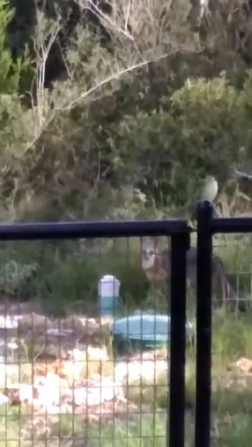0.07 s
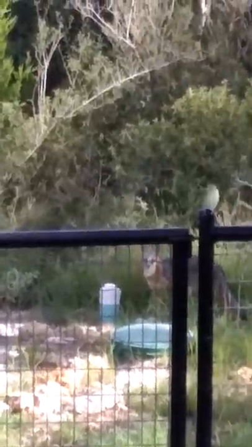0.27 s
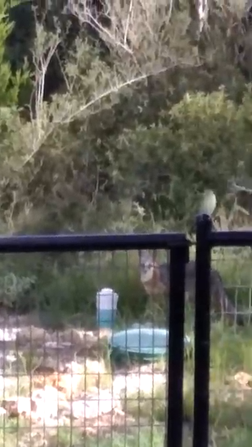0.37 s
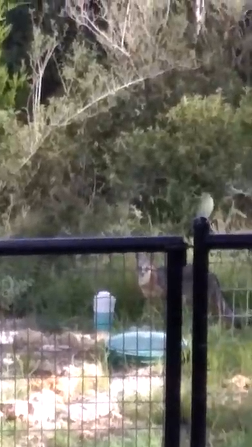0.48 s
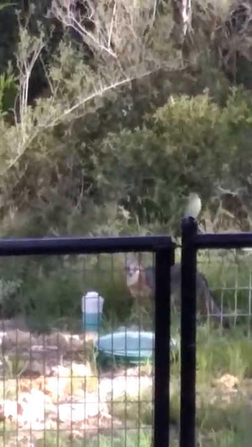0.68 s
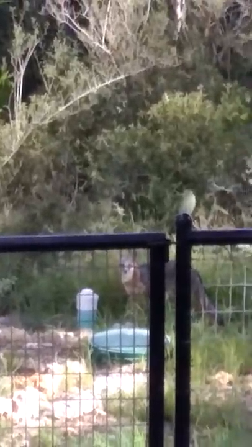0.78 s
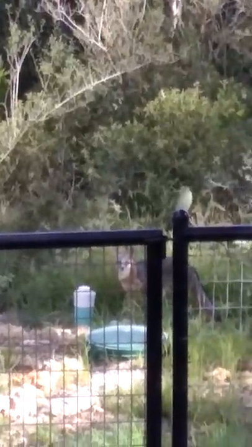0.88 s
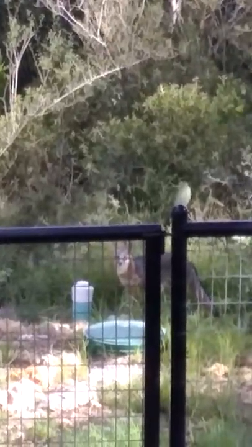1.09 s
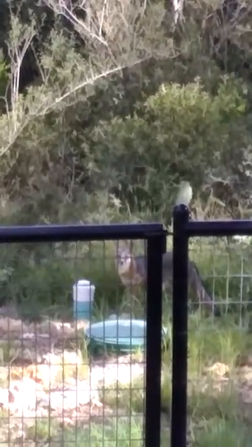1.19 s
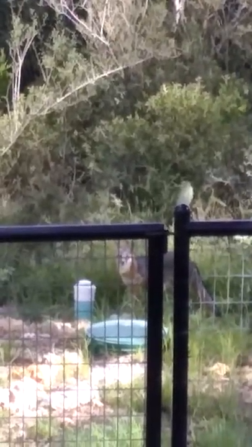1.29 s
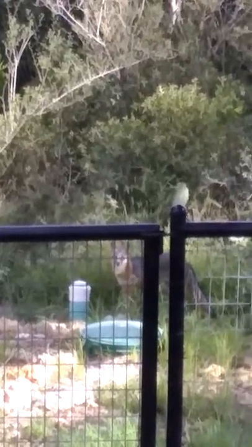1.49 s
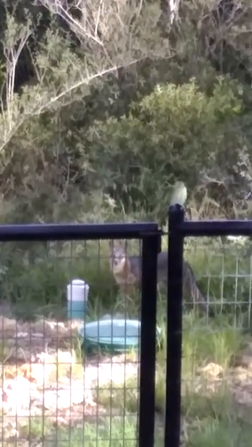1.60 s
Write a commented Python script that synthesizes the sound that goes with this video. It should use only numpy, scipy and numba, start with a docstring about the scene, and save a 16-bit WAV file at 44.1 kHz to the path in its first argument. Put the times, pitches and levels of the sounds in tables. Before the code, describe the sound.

Two raspy fox barks in quick succession outdoors, over a faint high insect buzz.

```python
"""A grey fox gives two hoarse barks from the edge of a yard, heard through a fence with scrub behind.
Its vocal folds ring throat and mouth; each bark arches in pitch and breaks into a rasp at the top,
and the bushes scatter it. An insect's wings buzz very high throughout, a dove coos once far off among
faint animal calls, and a thin hiss comes and goes over a low rumble."""
import sys
import numpy as np
from scipy import signal
from scipy.fft import rfft, irfft
from scipy.io import wavfile
from scipy.ndimage import uniform_filter1d, map_coordinates
from numba import njit

SR = 44100
rng = np.random.default_rng(int(sys.argv[2]) if len(sys.argv) > 2 else 0)


def transcribe(u):
    """Save the signal u as a 16-bit wav file named by the first command-line argument.

    u: samples, shape (n,) or (channels, n), limited to [-1, 1]; the rate is SR.
    q: integer samples, one column per channel.
    """
    v = np.clip(np.atleast_2d(u).T, -1, 1)
    q = np.round(v * 32767).astype(np.int16)
    wavfile.write(sys.argv[1], SR, q)


N = 72765
T = np.arange(N) / SR


def undb(db):
    """Decibels to gain."""
    return 10 ** (np.asarray(db) / 20)


def unit(x):
    """Scale to rms 1."""
    return x / np.sqrt(np.mean(x ** 2))


def curves(table):
    """Each column after time_s, interpolated linearly over T."""
    times, *columns = np.array(table, float).T
    return [np.interp(T, times, c) for c in columns]


def during(table):
    """1 over a table's time span, with short fades."""
    return uniform_filter1d(1. * ((T > table[0][0]) & (T < table[-1][0])), size=256)


def pan(db):
    """Stereo gains for a left-minus-right level."""
    return undb(np.array([[db], [-db]]) / 2)


def wander(rate_hz):
    """Smooth random curve, rms 1."""
    return unit(map_coordinates(rng.standard_normal(4096), [T * rate_hz], mode="wrap"))


def phase_rad(hz):
    """Running phase of a moving frequency."""
    return 2 * np.pi * np.cumsum(hz) / SR


def tint(x, colour):
    """Filter by (freq_hz, gain_db) points."""
    hz, db = np.array(colour, float).T
    bins_hz = np.fft.rfftfreq(N, 1 / SR)
    return irfft(rfft(x) * undb(np.interp(np.log(bins_hz + 1), np.log(hz), db)), N)


def noise(colour, correlation):
    """Coloured stereo noise, rms 1."""
    x = tint(rng.standard_normal((3, N)), colour)
    return unit(np.sqrt(correlation) * x[0] + np.sqrt(1 - correlation) * x[1:])


@njit
def bandpass(x, centre_hz, width_hz):
    """State-variable band-pass with a moving centre."""
    y, band, low = np.empty(len(x)), 0., 0.
    for i in range(len(x)):
        g, k = np.tan(np.pi * centre_hz[i] / SR), width_hz / centre_hz[i]
        v = (band + g * (x[i] - low)) / (1 + g * (g + k))
        band, low, y[i] = 2 * v - band, low + 2 * g * v, k * v
    return y


def resonate(x, hz, width_hz):
    """Steep resonance: two band-passes in series."""
    centre_hz = hz * np.ones(N)
    return bandpass(bandpass(x, centre_hz, 1. * width_hz), centre_hz, 1. * width_hz)


def background():
    """Faint outdoor air and a low, uneven rumble."""
    # freq_hz, gain_db
    air_colour = [(200, -5.5), (350, -10.5), (700, 3), (1100, -5), (1700, -2), (2200, -9.5), (4000, -14.5),
                  (8000, -15.5), (12000, -22.5), (15000, -30)]
    rumble_colour = [(20, -31.5), (40, -22.5), (60, 1.5), (82, 0.5), (105, -6.5), (170, -4.5), (250, -10.5),
                     (330, -5), (450, -23.5), (1200, -44.5), (6000, -81.5)]
    # time_s, level_db
    rumble_level = [(0, -63.5), (.2, -66.5), (.25, -58), (.45, -51), (.6, -50.5), (.69, -56), (.82, -46.5),
                    (.88, -56), (.95, -50.5), (.98, -65.5), (1.1, -68.5), (1.14, -62), (1.25, -70),
                    (1.65, -73.5)]
    rumble = noise(rumble_colour, correlation=.93) * undb(curves(rumble_level)[0] + 1.5)
    return rumble + undb(-70.5) * noise(air_colour, correlation=.2)


def far_calls():
    """Short wavering notes from distant animals."""
    # centre_s, length_s, pitch_hz, level_db
    notes = [(1.06, 0.031, 645, -65), (1.062, 0.071, 1450, -72), (1.16, 0.055, 1200, -75),
             (1.296, .06, 1475, -72), (1.338, 0.065, 1124, -75), (1.43, .06, 1460, -72.5)]
    calls = np.zeros(N)
    for centre_s, length_s, pitch_hz, level_db in notes:
        envelope = undb(level_db) * np.exp(-(2 * (T - centre_s) / length_s) ** 2)
        calls += envelope * np.sin(phase_rad(pitch_hz * (1 + .025 * wander(210))))
    return calls


def dove():
    """One distant, pure coo."""
    # time_s, pitch_hz, level_db
    coo = [(1.12, 529, -82), (1.134, 529, -94), (1.156, 550, -65.5), (1.188, 559, -62.5),
           (1.268, 566.4, -57), (1.412, 566, -61.5), (1.56, 543, -82.5)]
    pitch_hz, level_db = curves(coo)
    return np.sqrt(2) * np.sin(phase_rad(pitch_hz)) * undb(level_db) * during(coo) * pan(db=-3)


def hiss():
    """Thin, slightly fluttering hiss that comes and goes."""
    # freq_hz, gain_db
    colour = [(1500, -44.5), (3000, -9.5), (4200, -11), (4950, 0.5), (5500, -7), (6200, -10), (7200, -18),
              (9000, -23), (12000, -47.5)]
    # time_s, level_db
    level = [(0, -80.5), (.56, -69.5), (.61, -48.5), (.72, -47), (.88, -48.5), (.94, -57.5), (1.04, -60.5),
             (1.13, -81.5), (1.46, -94), (1.56, -70.5), (1.65, -69.5)]
    band = noise(colour, correlation=.2)
    flutter_db = 1.2 * wander(43)
    return band * undb(curves(level)[0] + flutter_db) * pan(db=-2.5)


def insect():
    """Rapid, even wing strokes pulse one high noise band."""
    # freq_hz, gain_db
    colour = [(7000, -42.5), (8800, -27.5), (9600, -10), (10150, -6), (10900, -6), (11250, -18),
              (11600, -45), (15000, -44)]
    # time_s, level_db
    level = [(0.0, -60.5), (0.096, -54), (0.206, -58), (0.33, -47.5), (0.574, -57.5), (0.67, -55),
             (0.84, -59), (0.864, -52), (0.946, -60.5), (0.964, -70), (1.364, -59.5), (1.492, -67),
             (1.584, -63.5), (1.65, -69)]
    stroke_hz, depth = 73.5, .27
    phase = phase_rad(stroke_hz * (1 + .002 * wander(4.2)))
    strokes = unit(1 + depth * np.cos(phase) + depth ** 2 * np.sin(2 * phase))
    return noise(colour, correlation=.08) * strokes * undb(curves(level)[0] - 1) * pan(db=-9.5)


def echoes(x, t60_s, build_s):
    """Dense reflections that build and decay, different on each side."""
    response = rng.standard_normal((2, N)) * undb(-60 * T / t60_s) * (1 - np.exp(-T / build_s))
    response /= np.sqrt(np.sum(response ** 2, axis=1, keepdims=True))
    return signal.fftconvolve(x[None], response, axes=1)[:, :N]


def yard(x, pan_db):
    """Direct path, scatter off ground and fence, echo from the scrub."""
    # freq_hz, gain_db
    echo_colour = [(150, 0.5), (250, 6.5), (340, 5), (500, -5), (810, 0.5), (1150, -3), (1700, 0.5),
                   (2900, 2.5), (5000, -12)]
    right_lag_s, scatter_low_hz = .00012, 800
    direct = np.array([x, np.interp(T - right_lag_s, T, x)])
    bright = signal.sosfilt(signal.butter(2, scatter_low_hz, "high", fs=SR, output="sos"), x)
    scatter = undb(-2) * echoes(bright, t60_s=.15, build_s=.0005)
    scrub = undb(-10) * echoes(tint(x, echo_colour), t60_s=.47, build_s=.01)
    return (direct + scatter + scrub) * pan(pan_db)


def suppress(x, threshold_db=-54.5, depth_db=-8.5):
    """Gate that turns down the faintest tails."""
    power = np.abs(uniform_filter1d(np.mean(x ** 2, axis=0), size=1500))
    shut = 10 * np.log10(power + 1e-12) < threshold_db
    return x * undb(depth_db * uniform_filter1d(1. * shut, size=700))


def larynx(pitch_hz, roughness, growl):
    """Vocal folds jitter and double their period; air rasps through in pulses."""
    jitter, wander_hz, shimmer_db, rasp_db = .05, 265.9, 3.5, 5
    phase = phase_rad(pitch_hz * (1 + jitter * roughness * wander(wander_hz)))
    folds = unit(sum(np.cos(k * phase) for k in range(1, 21)))
    folds *= 1 + growl * np.cos(phase / 2)
    folds *= undb(shimmer_db * roughness * wander(wander_hz))
    air = rng.standard_normal(N) * (1 + .5 * np.cos(phase))
    return np.sqrt(1 - roughness ** 2) * folds + undb(rasp_db) * roughness * air


def bark(voice, effort, throat):
    """The larynx rings mouth, chest and throat; a hum opens to full colour as effort rises."""
    hum_top_hz, soft_db, full_db = 420, -43, -27
    pitch_hz, roughness, growl, mouth_hz, bright_db = curves(voice)
    level_db, = curves(effort)
    source = larynx(pitch_hz, roughness, growl)
    mouth = undb(4.5) * resonate(source, mouth_hz, width_hz=254)
    chest = undb(-11) * resonate(source, pitch_hz, width_hz=200)
    formants = sum((-1) ** k * undb(gain_db + bright_db) * resonate(source, hz, width_hz)
                   for k, (hz, width_hz, gain_db) in enumerate(throat))
    hum = undb(5.5) * signal.sosfilt(signal.butter(3, hum_top_hz, fs=SR, output="sos"), source)
    opening = np.maximum.accumulate(np.clip((level_db - soft_db) / (full_db - soft_db), 0, 1))
    sound = opening * (mouth + chest + formants) + (1 - opening) * hum
    running_rms = np.sqrt(uniform_filter1d(sound ** 2, size=400) + 1e-12)
    return sound / running_rms * undb(level_db) * during(effort)


def fox():
    """Two hoarse barks across the yard, tails gated."""
    # time_s, pitch_hz, roughness, growl, mouth_hz, bright_db
    voice_1 = [(.21, 284.8, 0.2, 0.27, 380, 1.5), (.228, 339, 0.15, 0.18, 600, -1),
               (.245, 448.7, 0.28, 0.28, 860, -0.5), (.268, 553.2, 0.37, 0.3, 954, 6.5),
               (.3, 551.9, 0.57, 0.9, 743, -4.5), (.333, 562.9, 0.8, .6, 864, 8.5),
               (.355, 466.2, 0.46, 0.27, 890, 3), (.376, 397.7, 0.42, 0.2, 790, -3),
               (.41, 294.3, 0.78, 0.7, 807, 1.5)]
    voice_2 = [(.56, 275.3, 0.14, 0.43, 330, -8), (.582, 354.1, 0.093, 0, 521.4, -6.5),
               (.602, 490.1, 0.4, .5, 706, -4), (.634, 553.5, 0.51, 0.64, 837, -5),
               (.658, 569.6, 0.11, 0.73, 1110, -16), (.68, 543, 0.23, .1, 1150, 8),
               (.703, 492.3, 0.76, 0.28, 920, 14), (.728, 410.4, 0.44, .1, 790, 6.5),
               (.78, 277.5, 0.81, .1, 816, -17)]
    # time_s, level_db
    effort_1 = [(0.21, -63), (0.242, -23), (0.294, -19), (0.302, -13), (0.33, -24.5), (0.376, -18.5),
                (0.386, -39), (0.404, -29), (0.43, -43)]
    effort_2 = [(0.562, -42), (0.572, -38.5), (0.614, -20.5), (0.662, -15), (0.688, -22), (0.71, -21.5),
                (0.8, -37.5)]
    # resonances: centre_hz, width_hz, gain_db
    throat_1 = [(713, 140, -0.5), (1304, 330, -3.5), (1762, 210, -0.5), (2227, 660, -23), (2999, 320, -7.5),
                (4730, 540, -25), (5390, 150, -26), (8440, 700, -41.5)]
    throat_2 = [(722, 150, -7), (1109, 105, -6), (1546, 290, -2), (2100, 83, -20.5), (2789, 270, -10),
                (4920, 500, -30.5), (7530, 5800, -54)]
    first = undb(.5) * bark(voice_1, effort_1, throat_1)
    second = undb(-.5) * bark(voice_2, effort_2, throat_2)
    return suppress(yard(first, pan_db=-4) + yard(second, pan_db=-2.26))


def scene():
    """The fox over the sounds of the yard."""
    return fox() + insect() + hiss() + dove() + far_calls() + background()


def record(dry):
    """Steep low-pass on the mix."""
    top_hz = 15700
    return signal.sosfilt(signal.ellip(8, .2, 70, top_hz, fs=SR, output="sos"), dry)


dry = scene()
out = record(dry)
transcribe(out)
```